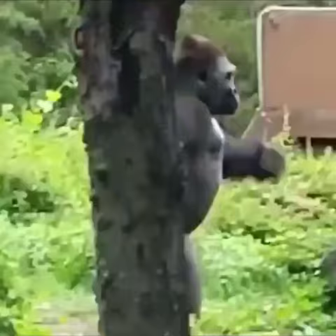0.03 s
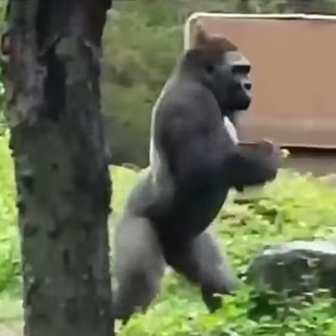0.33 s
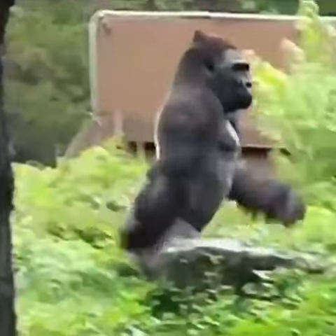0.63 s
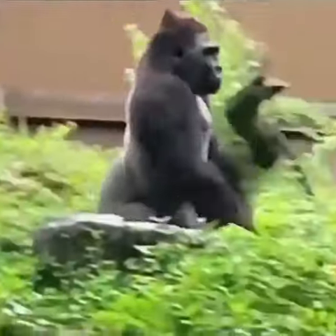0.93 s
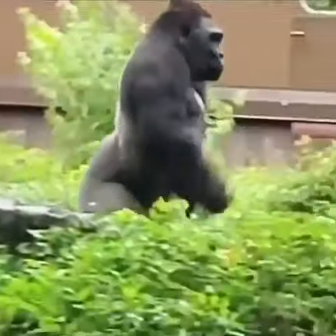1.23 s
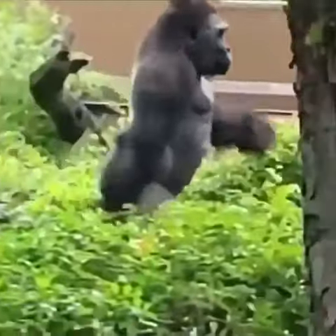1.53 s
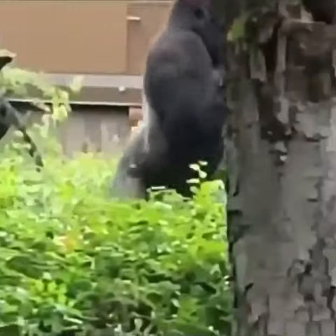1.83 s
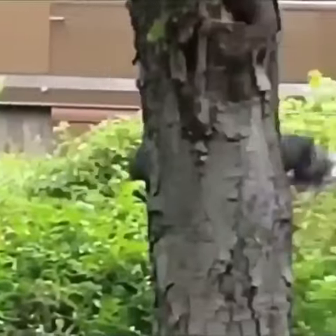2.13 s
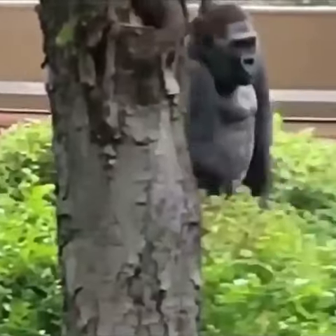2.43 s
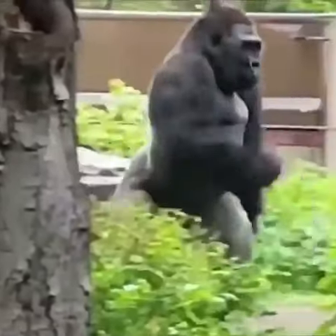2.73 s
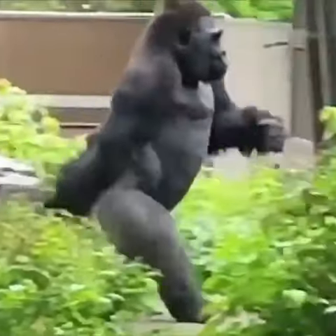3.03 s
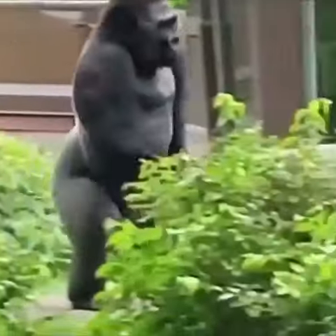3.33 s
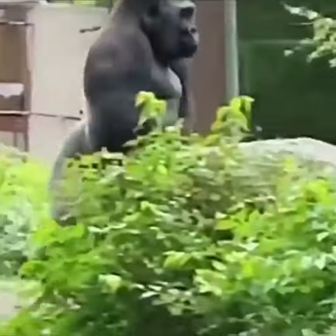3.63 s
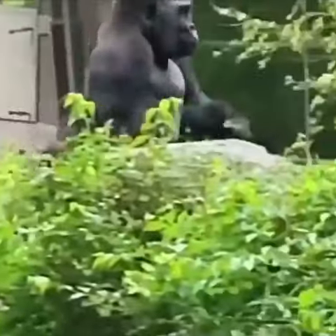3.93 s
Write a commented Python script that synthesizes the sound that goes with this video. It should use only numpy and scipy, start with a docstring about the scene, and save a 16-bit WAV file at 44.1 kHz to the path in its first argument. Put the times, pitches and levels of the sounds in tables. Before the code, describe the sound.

A low, steady rumble like distant traffic fills the open air beside a leafy animal enclosure. A broad wash of far noise and a thin, wide hiss of foliage lie over it, with a few barely audible knocks and chirps.

```python
"""Open air beside a leafy animal enclosure. A low rumble, as of distant traffic and machinery, lies
under a broad wash of far noise and a thin hiss of air and foliage. Each is spectrally shaped noise
whose bands fluctuate independently in amplitude. Faint knocks, chirps and leaf rustles are brief
swells of noise in one resonance. The sound opens after a quarter second of silence and rises to its
full level; only the hiss differs between left and right, so it alone sounds wide."""
import sys
import numpy as np
from scipy import signal
from scipy.fft import rfft, irfft
from scipy.io import wavfile

SR = 44100
rng = np.random.default_rng(int(sys.argv[2]) if len(sys.argv) > 2 else 0)


def digitize_waveform(pressure):
    """Quantize a signal to 16-bit integers and store it at the path in sys.argv[1].

    Rows of a 2-D input are taken as channels; values are limited to [-1, 1].
    """
    field = np.atleast_2d(pressure).T
    bounded = np.clip(field, -1, 1)
    quanta = np.round(bounded * 32767).astype(np.int16)
    wavfile.write(sys.argv[1], SR, quanta)


N = 176400
TIME = np.arange(N) / SR
FREQS = np.maximum(np.fft.rfftfreq(N, 1 / SR), 1)

# rms of each layer where its envelope stands at 0 dB
DEEP_RUMBLE_DB, UPPER_RUMBLE_DB, WASH_DB, HISS_DB = -36.5, -38, -38.5, -48.5

# Amplitude envelopes of the layers: time_s, gain_db
DEEP_RUMBLE_ENVELOPE = [(.25, -16), (.31, -9), (.44, -12), (.5, 0.5), (.65, 2), (.8, -2), (.95, -0.5),
                        (1.4, -1), (2.0, 0), (2.5, -0.5), (2.9, 0), (3.6, 1), (4, 0)]
UPPER_RUMBLE_ENVELOPE = [(.25, -23), (.45, -7), (.6, -6), (.8, -2.5), (1.08, 1.5), (1.5, -1.5), (1.85, 2.5),
                         (2.05, -4), (2.25, 1.5), (2.47, -2.5), (2.65, -1), (3.1, -3.5), (3.65, -3),
                         (4, -1)]
WASH_ENVELOPE = [(.25, -15), (.36, -7.5), (.5, -2.5), (.75, -1), (1.15, .5), (1.7, 0.9), (2.4, 1),
                 (3.05, -0.15), (3.6, 1), (4, 0.1)]
HISS_ENVELOPE = [(.25, -17), (.37, -8.5), (.52, -2), (.9, 0), (1.2, 0.1), (1.7, .7), (2.2, 0), (2.8, 0.8),
                 (3.3, 0.6), (3.75, -0.6), (4, 0.7)]
# Spectral shapes of the layers: frequency_hz, relative_density_db
DEEP_RUMBLE_SPECTRUM = [(12, -27), (25, -24), (45, -12.5), (62, -10.5), (78, -3.5), (86, -5), (97, -2),
                        (110, 0.5), (124, -3), (143, -8), (175, -14.5), (300, -37)]
UPPER_RUMBLE_SPECTRUM = [(100, -38), (145, -5.5), (163, 0), (185, 0), (203, -2.5), (238, -2), (265, -6),
                         (330, -11), (480, -21), (900, -47)]
WASH_SPECTRUM = [(120, -23.5), (330, 0), (470, -2.5), (620, 0), (800, -1.65), (1050, -1.04), (1300, -5),
                 (1520, -5), (1680, -2.5), (1920, -3), (2200, -5.5), (2500, -9.5), (3050, -7.5),
                 (3380, -8.5), (4170, -9), (4300, -12), (5300, -21), (8000, -25)]
HISS_SPECTRUM = [(3000, -59), (3650, -33), (3880, -3.5), (4400, 3), (5000, 4.5), (5500, 1.5), (7000, 1.5),
                 (8200, 0.5), (9000, -2.5), (11200, -2.5), (12300, 3), (13100, -4)]
# Dull bumps in the rumble: peak_s, centre_hz, level_db
RUMBLE_BUMPS = [(.748, 110, -31), (.793, 108, -31), (1.885, 133, -38), (2.47, 166, -35), (2.49, 101, -33),
                (3.06, 108, -29)]
# Far knocks, chirps and rustles: peak_s, half_length_s, centre_hz, bandwidth_hz, level_db
FAINT_EVENTS = [(0.781, 0.021, 1600, 700, -37), (1.136, 0.014, 960, 550, -33.5),
                (1.213, 0.018, 1200, 80, -40), (1.21, .04, 5370, 500, -54), (1.566, 0.027, 5500, 1400, -52),
                (1.665, 0.02, 2160, 90, -45), (2.474, 0.034, 1140, 70, -46), (3.17, 0.2, 6000, 400, -60),
                (3.44, .04, 4100, 70, -51), (3.653, 0.056, 10200, 2600, -54),
                (3.831, 0.013, 1740, 450, -35), (3.93, 0.04, 2510, 160, -42),
                (3.888, 0.17, 3225, 60, -48.5)]


def rumble():
    """Superposition: two low noise bands swell separately, and brief resonant bumps add to them."""
    deep = from_db(DEEP_RUMBLE_DB) * envelope(DEEP_RUMBLE_ENVELOPE)
    deep *= shaped_noise(DEEP_RUMBLE_SPECTRUM, flicker_db=1, bands=8)
    upper = from_db(UPPER_RUMBLE_DB) * envelope(UPPER_RUMBLE_ENVELOPE)
    upper *= shaped_noise(UPPER_RUMBLE_SPECTRUM, flicker_db=1, bands=8)
    bumps = sum(resonant_swell(peak_s, 0.027, centre_hz, bandwidth_hz=63, level_db=level_db)
                for peak_s, centre_hz, level_db in RUMBLE_BUMPS)
    return deep + upper + bumps


def far_wash():
    """Incoherent summation: far sounds blend into midrange noise; a narrow resonance adds a thin ring."""
    midrange = from_db(WASH_DB) * shaped_noise(WASH_SPECTRUM, flicker_db=2.5, bands=72)
    ring = from_db(-65.5) * unit_rms(resonant_noise(centre_hz=3210, bandwidth_hz=70))
    return envelope(WASH_ENVELOPE) * (midrange + ring)


def foliage_hiss(correlation=0.19):
    """Decorrelation: the hiss of air and leaves sounds wide because left and right are barely alike."""
    mid = shaped_noise(HISS_SPECTRUM, flicker_db=3, bands=24)
    side = shaped_noise(HISS_SPECTRUM, flicker_db=3, bands=24) * np.array([[1], [-1]])
    stereo = np.sqrt(1 + correlation) * mid + np.sqrt(1 - correlation) * side
    return from_db(HISS_DB) * envelope(HISS_ENVELOPE) * unit_rms(stereo)


def knocks_chirps_rustles():
    """Partial masking: small, far, band-limited sounds barely clear the surrounding noise."""
    return sum(resonant_swell(*event) for event in FAINT_EVENTS)


def shaped_noise(spectrum, flicker_db, bands):
    """Spectral shaping: coloured noise of unit rms, in overlapping bands that each flicker alone."""
    frequency_hz, density_db = np.transpose(spectrum)
    top_hz = frequency_hz.max()
    colour = from_db(np.interp(np.log(FREQS), np.log(frequency_hz), density_db))
    colour /= 1 + (FREQS / (2 * top_hz)) ** 2   # rolls off beyond the table
    coloured = colour * white_spectrum()
    band_position = np.minimum(FREQS / top_hz, 1) * (bands - 1)
    noise = np.zeros(N)
    for band in range(bands):
        triangle = np.maximum(1 - abs(band_position - band), 0)
        noise += irfft(coloured * triangle, N) * flicker(flicker_db, corner_hz=20)
    common_sway = flicker(depth_db=0.37, corner_hz=15)
    return unit_rms(noise * common_sway)


def resonant_swell(peak_s, half_length_s, centre_hz, bandwidth_hz, level_db):
    """Amplitude modulation: a Gaussian envelope lifts resonant noise to about level_db rms at its peak."""
    bell = np.exp(-2 * ((TIME - peak_s) / half_length_s) ** 2)
    swell = bell * resonant_noise(centre_hz, bandwidth_hz)
    return from_db(level_db) * swell * np.sqrt(np.sum(bell ** 2) / np.sum(swell ** 2))


def resonant_noise(centre_hz, bandwidth_hz):
    """Resonance: one peak selects a band of white noise, bandwidth_hz wide at 6 dB down."""
    detuning = 2 * (FREQS - centre_hz) / bandwidth_hz
    return irfft(white_spectrum() / (1 + detuning ** 2), N)


def flicker(depth_db, corner_hz, points=1024):
    """Random modulation: low-passed noise moves a gain by depth_db rms."""
    modulation_hz = np.fft.rfftfreq(points, N / SR / points)
    spectrum = rfft(rng.standard_normal(points)) / (1 + (modulation_hz / corner_hz) ** 2)
    gain = from_db(depth_db * unit_rms(irfft(spectrum, points)))
    return np.interp(TIME, np.linspace(0, N / SR, points), gain)


def white_spectrum():
    """White noise has equal mean power at every frequency; this is the spectrum of a fresh draw."""
    return rfft(rng.standard_normal(N))


def envelope(points):
    """Exponential growth and decay: the gain runs straight in decibels from point to point."""
    return from_db(np.interp(TIME, *np.transpose(points)))


def from_db(db):
    """The decibel scale: 20 dB is a factor of ten in amplitude."""
    return 10 ** (np.asarray(db) / 20)


def unit_rms(x):
    """Normalisation to a mean power of one."""
    return x / np.sqrt(np.mean(x ** 2) + 1e-20)


def scene():
    """Linear superposition: the pressures of all sources add at the microphone."""
    return rumble() + far_wash() + foliage_hiss() + knocks_chirps_rustles()


def record(dry):
    """Gating and band limiting: a short ramp ends the silence, and a steep low-pass cuts the top treble."""
    silence_s, ramp_s, cutoff_hz = 0.2428, 0.0071, 13100
    opened = dry * np.clip((TIME - silence_s) / ramp_s, 0, 1)
    low_pass = signal.ellip(14, 0.1, 90, cutoff_hz, fs=SR, output="sos")
    return signal.sosfilt(low_pass, opened + 1e-18)


dry = scene()
out = record(dry)
digitize_waveform(out)
```